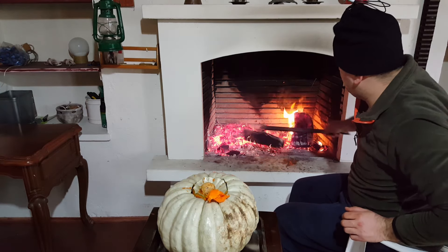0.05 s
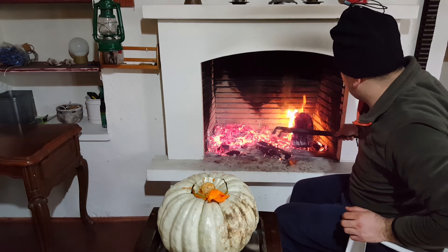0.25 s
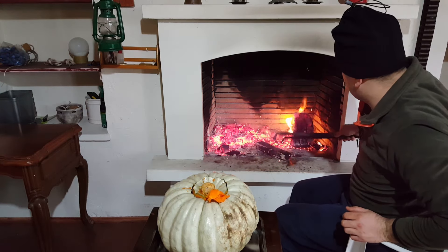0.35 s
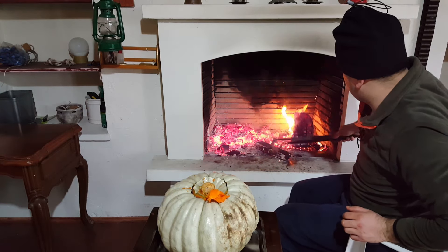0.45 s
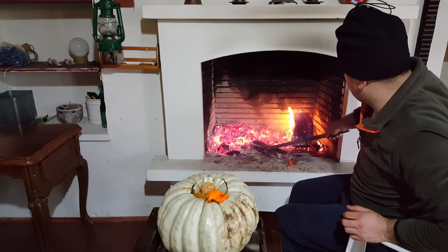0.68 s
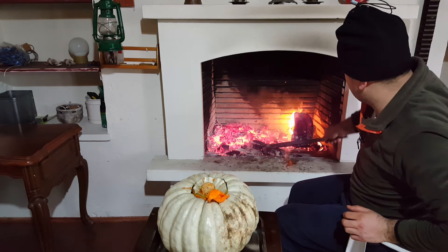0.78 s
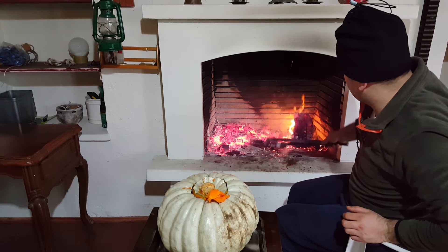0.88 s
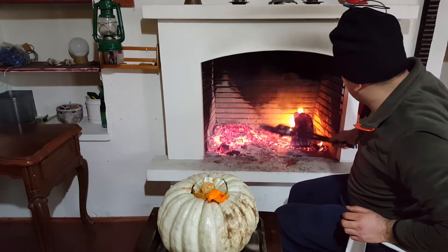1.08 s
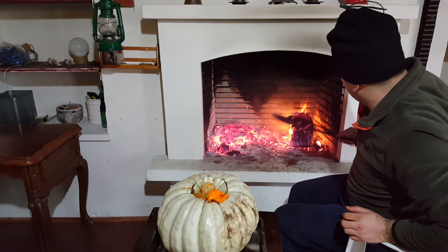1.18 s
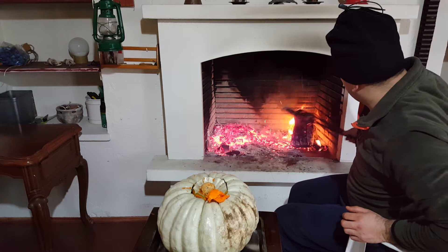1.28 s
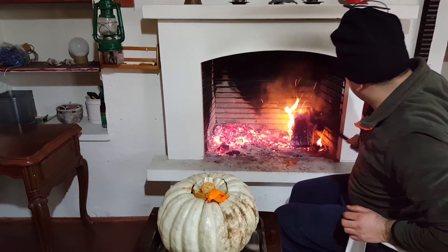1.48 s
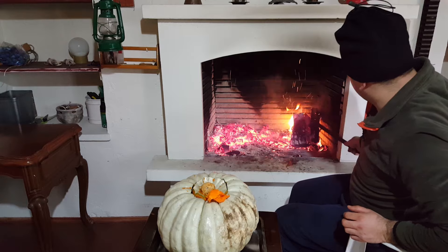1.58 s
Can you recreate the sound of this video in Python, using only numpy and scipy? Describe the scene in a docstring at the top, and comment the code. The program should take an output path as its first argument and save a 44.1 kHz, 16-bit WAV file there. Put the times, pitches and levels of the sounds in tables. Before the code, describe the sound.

A small iron shovel stirs embers in a brick fireplace indoors. It knocks with a brief ring, a log tumbles with dull booming thumps, then gritty scrapes and a few ember snaps follow over softly fluttering flames.

```python
"""A small iron shovel works the embers of an open brick fireplace in a living room.
Short strokes grind on brick, crush charcoal and sweep ash; knocks on the hearth ring the blade.
A log tumbles with dull thumps that boom in the firebox, then rolls to rest.
Embers snap and tick over the low flutter of the flames."""
import sys
import numpy as np
from scipy import signal
from scipy.fft import rfft, irfft
from scipy.io import wavfile

SR = 44100
rng = np.random.default_rng(int(sys.argv[2]) if len(sys.argv) > 2 else 0)


def to_wav(s):
    """Save 16-bit WAV."""
    ch = np.atleast_2d(s).T  # columns
    pcm = np.round(np.clip(ch, -1, 1) * 32767)  # PCM
    wavfile.write(sys.argv[1], SR, pcm.astype(np.int16))


N = 72765

# blade and firebox modes: freq_hz, level_db, t60_s
BLADE_AND_FIREBOX_MODES = [(456, 8.5, 0.038), (600, -15, .35), (654.6, -6, 0.12), (814.5, -7, 0.1), (826, 9, 0.033),
                           (1150, -15, 0.22), (1329, 5, 0.096), (1850, -15, 0.38), (2146, -17, 0.045), (2286, -6, 0.11),
                           (2715, 0, 0.061), (2980, -1.5, 0.021), (3410, -9.5, 0.091), (4470, 9, 0.042)]


def amp(db):
    """Decibels to gain."""
    return 10 ** (np.asarray(db) / 20)


def unit(x):
    """Scale to unit rms."""
    return x / np.sqrt(np.mean(x ** 2) + 1e-20)


def read(points, hz):
    """Interpolate a table over log frequency."""
    freq_hz, value = np.transpose(points)
    return np.interp(np.log(hz + 1), np.log(freq_hz), value)


def add(mix, start_s, sound):
    """Mix in a sound at start_s."""
    part = mix[max(round(start_s * SR), 0):][:len(sound)]
    part += sound[:len(part)]


def through(x, response):
    """Convolve with a response scaled to unit energy."""
    return signal.fftconvolve(x, response / np.linalg.norm(response))[:len(x)]


def colour(x, tone, tilt_db_per_oct=0, size=4096):
    """Minimum-phase filter shaped by a tone table and a tilt."""
    hz = abs(np.fft.fftfreq(size, 1 / SR))
    log_gain = np.log(amp(read(tone, hz) + tilt_db_per_oct * np.log2(1 + hz / 2000)))
    spectrum = np.exp(np.conj(signal.hilbert(log_gain)))
    return through(x, np.fft.ifft(spectrum).real[:size // 2])


def ringing(modes):
    """Impulse response of damped modes."""
    t = np.arange(SR // 2) / SR
    return sum(amp(db - 60 * t / t60_s) * np.cos(2 * np.pi * hz * t) for hz, db, t60_s in modes)


def drift(span_s):
    """Smooth random wander, unit rms."""
    hz = np.fft.rfftfreq(2 * N, 1 / SR)
    spectrum = rfft(rng.standard_normal(2 * N)) * np.exp(-(2 * hz * span_s) ** 2)
    return unit(irfft(spectrum)[:N])


def grains(rate_per_s=7700, spread_db=3, clump_db=3):
    """Dense clumped clicks of uneven size."""
    size = amp(spread_db * np.minimum(rng.exponential(1, N), 4) + clump_db * drift(span_s=0.0028))
    return unit(size * rng.choice([-1, 1], N) * (rng.random(N) < rate_per_s / SR))


def burst(decay_s, size=2048):
    """Brief crumbling contact: near-flat spectrum, energy of 4 ms at full level."""
    age = np.arange(size) / SR / decay_s
    envelope = age * np.exp(1 - age)
    grit = rfft(rng.choice([-1, 1], size) * envelope)
    whitened = irfft(grit / (abs(grit) + abs(grit).mean() / 10))
    contact = whitened * np.sqrt(envelope)
    return contact / np.linalg.norm(contact) * np.sqrt(.004 * SR)


def diffuse(pair):
    """Diffuse field: two independent signals made alike in the bass."""
    # freq_hz, left_right_coherence
    likeness = [(30, 0.97), (130, 1), (260, 0.93), (500, 0.59), (1000, 0.1), (2500, 0.067), (8000, 0.05)]
    a, b = rfft(pair)
    coherence = read(likeness, np.fft.rfftfreq(pair.shape[1], 1 / SR))
    mid, side = a * np.sqrt((1 + coherence) / 2), b * np.sqrt((1 - coherence) / 2)
    return irfft(np.array([mid + side, mid - side]), pair.shape[1])


def room(x, wet_db, build_s=0.0013, scatter_share=0.46, left_lag_samples=3):
    """Direct sound, treble scattered by the bricks, and the room's tail."""
    # freq_hz, t60_s
    decay_times = [(100, 0.54), (500, 0.52), (2500, 0.3), (7000, 0.36), (16000, 0.17)]
    hz, t, noise = signal.stft(diffuse(rng.standard_normal((2, SR // 2))), SR, nperseg=256)
    decay = amp(-60 * t / read(decay_times, hz)[:, None])
    tails = signal.istft(noise * decay * (1 - np.exp(-t / build_s)), SR, nperseg=256)[1]
    treble = signal.lfilter(*signal.butter(1, 1840, "high", fs=SR), x)
    straight = x - scatter_share * treble
    direct = np.array([np.pad(straight, (left_lag_samples, 0))[:N], straight])
    reflected = [through(treble, burst(decay_s=0.00048)) + amp(wet_db) * through(x, tail)
                 for tail in tails]
    return direct + np.array(reflected)


def shovel_scrapes(release_s=0.011, grind_ring_db=-24, crunch_ring_db=-16, wet_db=-1.5):
    """Strokes grind on brick, crush charcoal and sweep ash; blade and firebox ring faintly."""
    # start_s, length_s, rise_s, grind_db, crunch_db, hiss_db
    strokes = [(0.0, 0.0053, 0.00067, -60.5, -41.5, -49), (0.017, 0.14, 0.0033, -65, -60.5, -62.5),
               (0.126, 0.014, 0.013, -67, -55, -56), (.546, 0.022, 0.018, -77, -56.5, -68),
               (0.565, 0.012, 0.014, -61, -47.5, -43), (0.608, 0.026, 0.0056, -42.5, -48, -54),
               (0.655, 0.094, 0.0086, -53.5, -56.5, -64), (0.741, 0.062, .01, -51.5, -57.5, -59),
               (.82, 0.072, 0.0045, -63.5, -59, -60), (0.918, 0.0083, 0.006, -80, -56, -45.5),
               (0.948, 0.026, 0.0034, -92, -63, -81), (0.961, 0.024, 0.0049, -67.5, -50.5, -51),
               (0.991, 0.024, 0.0013, -58.5, -56.5, -53.5), (1.498, 0.053, 0.0064, -53.5, -57, -75),
               (1.515, 0.15, 0.031, -65.5, -54.5, -59), (1.603, 0.044, 0.015, -80, -55.5, -54)]
    # spectra: freq_hz, gain_db
    brick_tone = [(40, -43), (80, -25), (125, 3.5), (200, 1.5), (330, -10.5), (600, -5), (1000, -9),
                  (1500, -14.5), (2300, -9), (3200, -51), (6000, -35), (16000, -91)]
    charcoal_tone = [(100, -7), (600, -10.5), (1300, -6), (1900, 0), (3200, -1), (5000, 0.5), (6200, -4),
                     (8800, -4.5), (9800, -15.5), (16000, -8)]
    ash_tone = [(100, -42), (3000, -13), (7500, 0), (15500, 0)]
    t, powers = np.arange(N) / SR, np.zeros((3, N))
    for start_s, length_s, rise_s, *levels_db in strokes:
        attack = np.clip((t - start_s) / rise_s, 0, 1)
        release = np.exp(-np.maximum(t - start_s - length_s, 0) / release_s)
        powers += (amp(levels_db)[:, None] * attack * release) ** 2
    grind, crunch, hiss = [colour(np.sqrt(power) * grains(), tone)
                           for power, tone in zip(powers, (brick_tone, charcoal_tone, ash_tone))]
    resonance = through(amp(grind_ring_db) * grind + amp(crunch_ring_db) * crunch, ringing(BLADE_AND_FIREBOX_MODES))
    return room(grind + crunch + hiss + resonance, wet_db) / np.hypot(1, amp(wet_db))


def flames(level_db=-59.5, flutter_db=2.4):
    """Low flutter of the fire with a faint hiss."""
    # freq_hz, gain_db
    flame_tone = [(20, -14), (45, -18.5), (80, -4), (135, 0.5), (200, -11), (330, -13), (600, -19.5),
                  (1300, -23), (2400, -21.5), (4500, -32.5), (9000, -39), (16000, -34)]
    air = diffuse(rng.standard_normal((2, N)))
    envelope = amp(level_db - flutter_db * drift(span_s=.06))
    return envelope * np.array([colour(side, flame_tone) for side in air])


def log_tumble(boom_db=-8.5, roll_start_s=0.258, roll_db=-36, rise_s=0.011, fall_db_per_s=141):
    """A log drops in soft thumps that boom in the firebox, and rolls to rest."""
    # centre_s, peak_db, pitch_hz
    thumps = [(0.2312, -34, 150), (0.2532, -34, 171), (0.2629, -30, 287), (0.2706, -34, 237),
              (0.278, -20.5, 164), (0.3, -35, 129), (0.3304, -29.5, 156), (0.355, -38, 153),
              (0.38, -43.5, 144), (.431, -42.5, 158), (0.146, -50, 136), (.631, -38.5, 150),
              (0.678, -40.5, 138), (.777, -40, 131), (0.814, -44.5, 134), (1.238, -51.5, 128),
              (1.552, -50, 148), (1.593, -48, 140)]
    # freq_hz, level_db, t60_s
    firebox_modes = [(126.4, -2.5, 0.33), (169.7, -14, .35), (205, -34, 0.19), (264.4, -7, 0.38),
                     (278.5, -5, 0.53), (387, -21, 0.46), (394, -2, 0.33), (545, 13, .34)]
    thuds, t = np.zeros(N), np.arange(N) / SR
    for centre_s, peak_db, pitch_hz in thumps:
        cycles = (t - centre_s) * pitch_hz
        thuds += amp(peak_db) * np.cos(2 * np.pi * cycles) * np.exp(-(cycles / 0.89) ** 2)
    boom = amp(boom_db) * thuds.std() * unit(through(thuds, ringing(firebox_modes)))
    # freq_hz, gain_db
    roll_tone = [(30, -20), (65, -27), (100, -5.5), (270, 5.5), (330, 2.5), (420, -5), (555, 0),
                 (640, -14.5), (1000, -17.5), (2000, -43), (16000, -77)]
    age_s = np.maximum(t - roll_start_s, 0)
    envelope = np.minimum(age_s / rise_s, 1) * amp(roll_db - fall_db_per_s * age_s)
    roll = envelope * diffuse(np.array([grains(), grains()]))
    return thuds + boom + np.array([colour(side, roll_tone) for side in roll])


def ember_snaps(bandwidth_hz=690):
    """Embers crack; the charcoal gives a short glassy ring."""
    # start_s, ring_db, pitch_hz, crack_db
    snaps = [(.196, -74, 12000, -80), (.34, -64, 11850, -72), (0.448, -78, 12100, -77),
             (.789, -60, 13400, -70), (0.9248, -58, 10800, -52), (0.927, -50.5, 8400, -56.5),
             (0.9302, -52, 13500, -51.5), (1.128, -71, 12000, -64), (1.1591, -45, 8700, -46),
             (1.1619, -50, 9060, -50.5), (1.1682, -60, 8700, -53), (1.307, -74, 12860, -73.5),
             (1.332, -75, 12200, -87)]
    # freq_hz, gain_db
    crack_tone = [(100, 8.5), (900, -17.5), (1350, 2.5), (2500, -3.5), (5500, -3.5), (7500, 2),
                  (11000, -0.5), (13000, -8), (16000, -17)]
    out = np.zeros(N)
    for start_s, ring_db, pitch_hz, crack_db in snaps:
        crack = burst(decay_s=0.000162)
        t = np.arange(len(crack)) / SR
        ring = unit(t * np.exp(-np.pi * bandwidth_hz * t) * np.sin(2 * np.pi * pitch_hz * t))
        add(out, start_s, amp(ring_db) * crack.std() * ring + amp(crack_db) * colour(crack, crack_tone))
    return out


def shovel_knocks(ring_db=-8.5):
    """The blade strikes gritty brick; blade and firebox ring briefly."""
    # start_s, level_db, crumble_s, tilt_db_per_oct
    knocks = [(.2188, -40, .0004, 1), (0.2205, -32, 0.00053, 0.5), (.2224, -34, .0004, -1),
              (.2274, -41, 0.0022, -3.5), (0.2595, -38.5, 0.001, 4), (.574, -51, 0.0043, -4),
              (0.6106, -55.5, 0.00057, -9), (.621, -61, 0.00098, -9), (.697, -46, 0.00074, -19),
              (1.507, -48.5, 0.0018, -9), (1.551, -54, 0.0018, 9), (1.563, -48, 0.0018, -2.5)]
    # freq_hz, gain_db
    knock_tone = [(60, -15), (200, 2), (450, -3.5), (700, -8.5), (900, -3.5), (1150, -8.5), (1550, -10),
                  (2200, -2), (3300, -2), (4200, -7), (8500, -8), (10300, -17), (12000, -14.5),
                  (16000, -25)]
    contacts = np.zeros(N)
    for start_s, level_db, crumble_s, tilt_db_per_oct in knocks:
        add(contacts, start_s, amp(level_db) * colour(burst(crumble_s), knock_tone, tilt_db_per_oct))
    resonance = unit(through(contacts, ringing(BLADE_AND_FIREBOX_MODES)))
    return contacts + amp(ring_db) * contacts.std() * resonance


def scene(left_bias_db=1.15):
    """Stereo hearth mix, slightly stronger on the left."""
    hits = room(shovel_knocks(), wet_db=-2.5) + room(ember_snaps(), wet_db=-2.5)
    mix = hits + shovel_scrapes() + log_tumble() + flames()
    return mix * amp([[left_bias_db / 2], [-left_bias_db / 2]])


def record(dry):
    """Linear-phase low-pass at 16 kHz."""
    lowpass = signal.firwin(401, 16000, window=("kaiser", 9), fs=SR)
    return signal.oaconvolve(dry, lowpass[None], "same")


dry = scene()
out = record(dry)
to_wav(out)
```